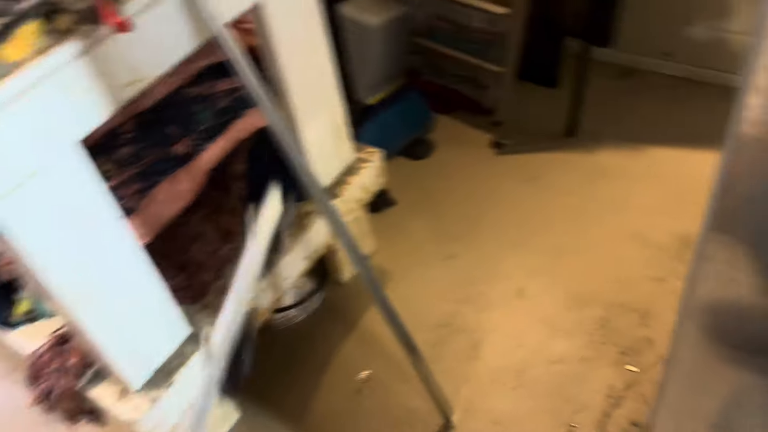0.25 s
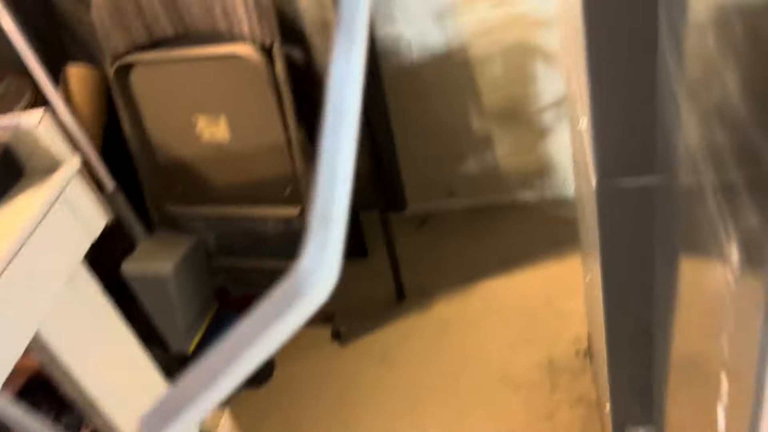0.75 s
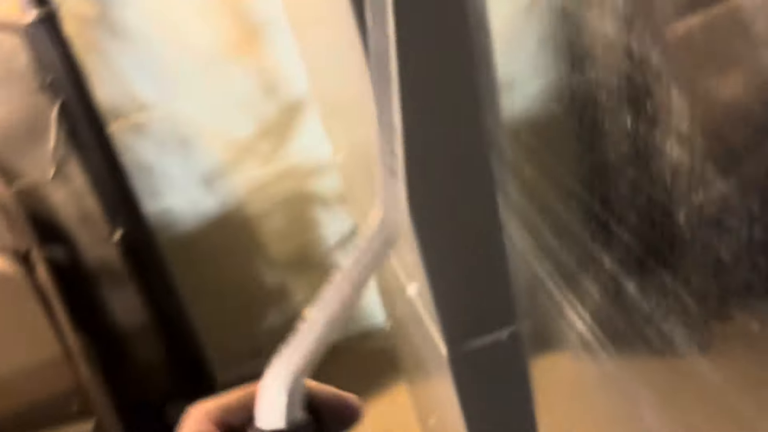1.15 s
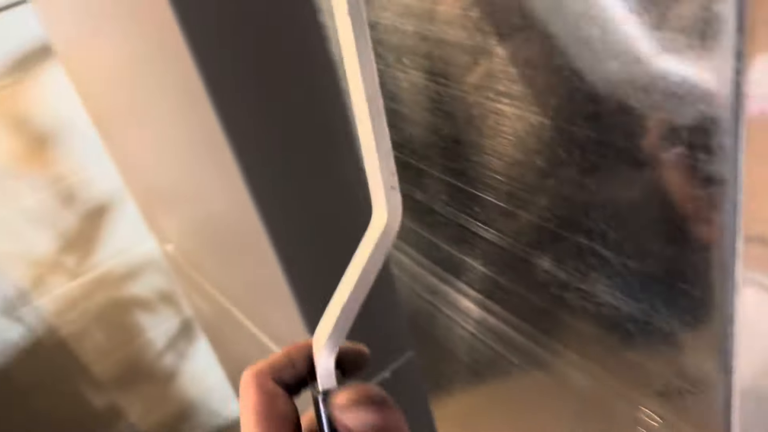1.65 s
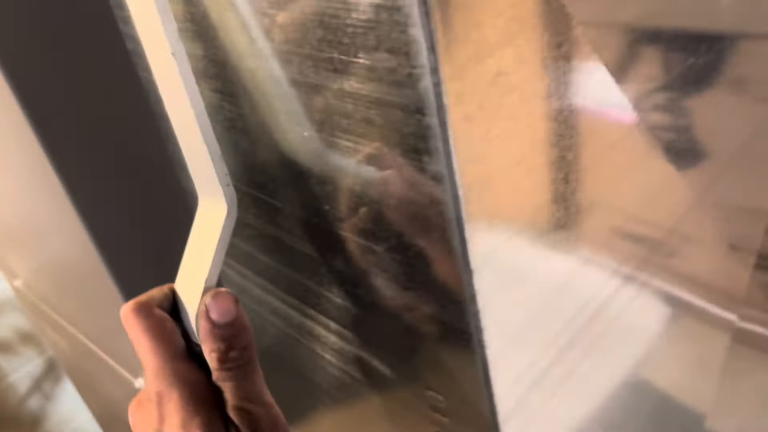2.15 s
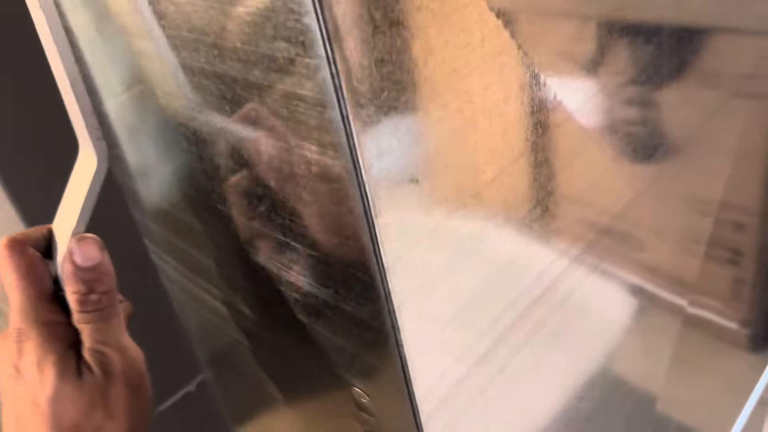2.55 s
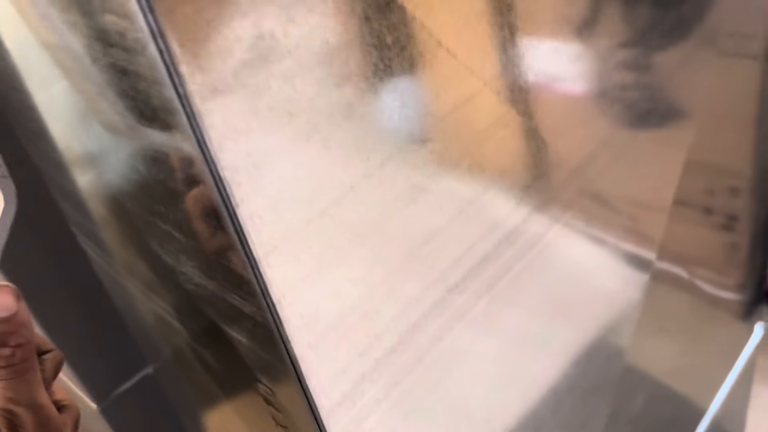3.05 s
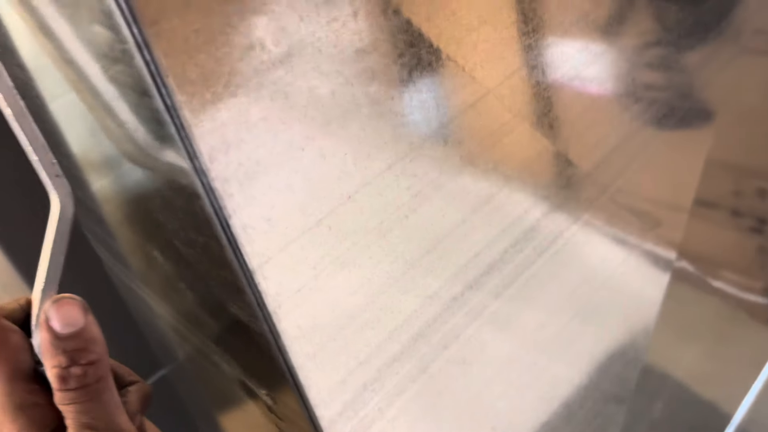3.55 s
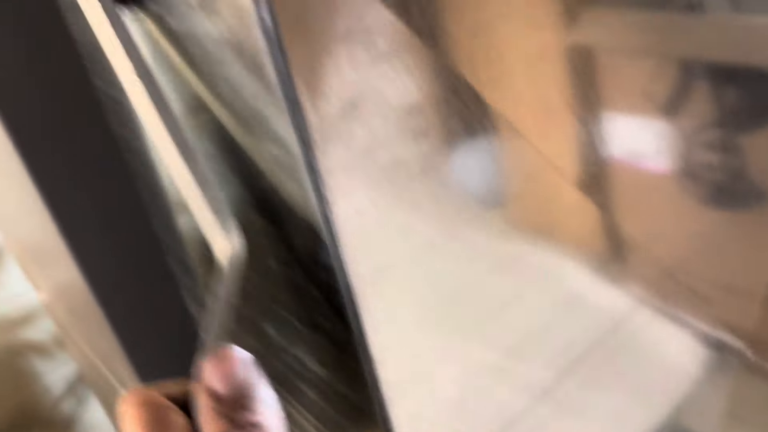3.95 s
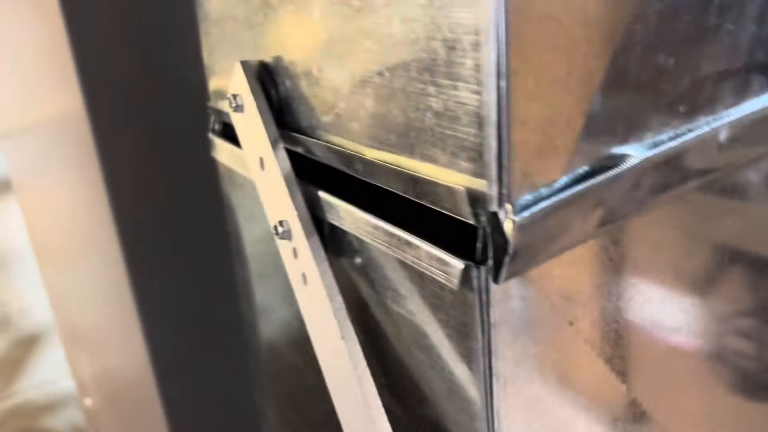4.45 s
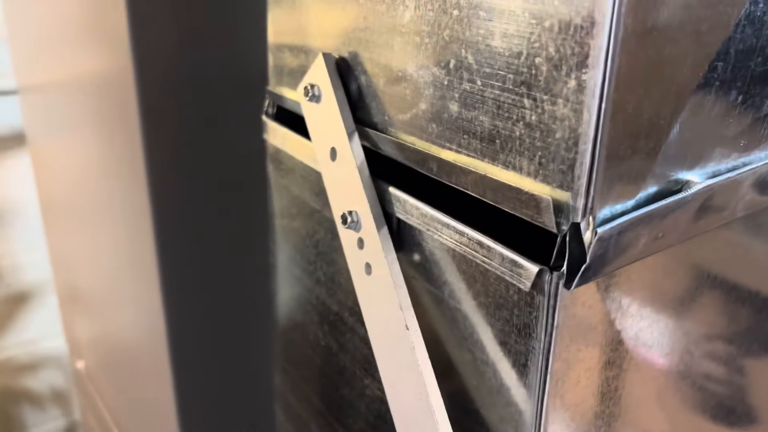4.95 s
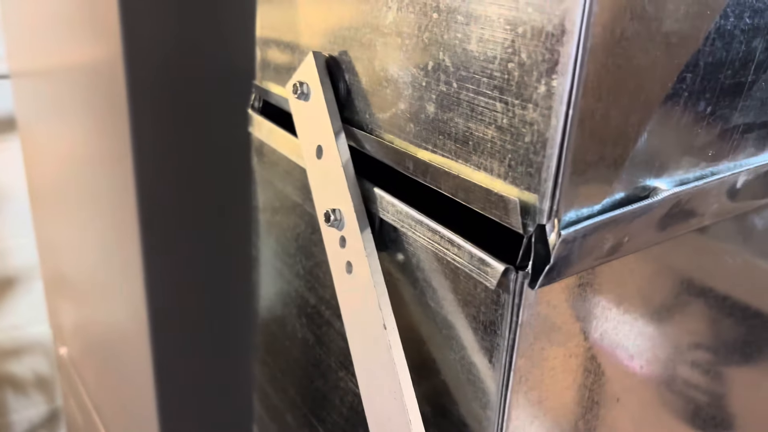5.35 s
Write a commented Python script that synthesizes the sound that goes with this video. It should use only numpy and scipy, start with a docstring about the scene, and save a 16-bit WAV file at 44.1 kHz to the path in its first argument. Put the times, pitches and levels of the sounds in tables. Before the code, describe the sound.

Sheet-metal ductwork is handled close by in a basement: irregular clanks, booming thin panels, wobbling rumbles, light scrapes and dry creaks over a low room drone.

```python
"""Clanks, ticks and scrapes of steel on sheet metal, close by: a bent hand tool works along a duct seam in a basement.
Each clank is noise split into bands that fade like thin panels, with clear tones and the ring of the struck part.
Blows make some panels boom, pushes make a low wobbling rumble, and slips of the seam make dry creaks.
Faint breathy hisses, a few dull bumps and the low drone of the room lie underneath, made of filtered noise and sines."""
import sys
import numpy as np
from scipy import signal
from scipy.fft import rfft, irfft
from scipy.io import wavfile
from scipy.ndimage import uniform_filter1d

SR = 44100
rng = np.random.default_rng(int(sys.argv[2]) if len(sys.argv) > 2 else 0)


def digitize_waveform(pressure):
    """Quantize a signal to 16-bit integers and store it at the path in sys.argv[1].

    Rows of a 2-D input are taken as channels; values are limited to [-1, 1].
    """
    field = np.atleast_2d(pressure).T
    bounded = np.clip(field, -1, 1)
    quanta = np.round(bounded * 32767).astype(np.int16)
    wavfile.write(sys.argv[1], SR, quanta)


N = 246513
TIME = np.arange(N) / SR  # [s]
FREQS = np.fft.rfftfreq(2 ** 18, 1 / SR)  # [Hz]

# the tool hits the duct: (time [s], level [dB], bass [dB], body [dB], clatter [dB], treble [dB],
# crack [dB], ring length [factor], part that rings [name], level of that part [dB])
# all levels after the first are relative to the blow
BLOWS = [(0.1354, -53.5, -4, -7, -16, -41, -9, 0.99, "bracket", -6),
         (0.216, -63.5, -22, -17, -6, 18, 23, 0.061, "lip", -19),
         (0.479, -55.5, 1.5, 4.5, 2, -9.5, -4, 0.9, "seam", 4.5),
         (0.635, -60.5, 3, 9, -12, -16, 4, 0.25, "bracket", -4),
         (1.312, -32.5, -1, -4.5, -3, 2, 17.5, 0.31, "rim", -2.5),
         (1.32, -37, -9, -5.5, -3.5, -0.5, -8, 1.23, "seam", -3),
         (1.394, -44, -24, -16, -3, -13, 9, 0.29, "seam", 1.5),
         (1.532, -55.5, 5, 5, -1, 2, 6, 0.51, "seam", 13),
         (1.599, -46.5, -33, -27, -6, -19, -1, 0.29, "seam", 3.5),
         (1.735, -38.5, -1.5, 0, -3.5, -7, -1, 0.62, "corner", 0.5),
         (1.777, -41.5, 0, 1, -21, -34, -7, 0.43, "corner", -5),
         (1.913, -58.5, 11, 11.5, -17, -50, 2, 2.6, "corner", 4.5),
         (2.0578, -63, 6, 14, 9, 7, 17, 1.02, "bracket", -20),
         (2.10, -62, 10, -2, 3, -8, -6, 0.77, "corner", 4.5),
         (2.208, -54.5, 8, 9.5, 3, -10, -12, 0.098, "cleat", -10.5),
         (2.53, -41, -1.5, 0.5, 0, -15, -14, 0.61, "hem", -4.5),
         (2.565, -49, 6, 6, 0, -10, -2, 0.43, "hem", -2),
         (2.735, -41, 1, 5, -1, 1.5, 17, 0.57, "lip", -3.5),
         (2.802, -42, -7, -0.5, 2, -2.5, 15.5, 1.16, "cleat", -1),
         (2.8792, -29, -2.5, -6, 7.5, -5, 7.5, 0.18, "flange", -2),
         (2.895, -30.5, 2.5, 2.5, 1, -1.5, 10, 0.61, "tool", 0),
         (2.908, -36, 0, 2.5, -3, -5.5, -3, 0.76, "stiffener", -5.5),
         (2.951, -36, 4.5, 4.5, 2.5, -12, 5, 0.48, "stiffener", -7.5),
         (3.011, -45.5, 12, 4.5, -20, -20, -3, 0.63, "seam", 3),
         (3.289, -43, -3.5, -7, -5.5, -23, -9, 0.79, "bracket", -7.5),
         (3.56, -44, -4, 1.5, 1, -4.5, 8, 0.62, "bracket", -2),
         (3.952, -48, 11, 5, 7, 1, 6, 0.85, "bracket", -5),
         (3.9658, -32.5, -2, 2.5, 0, -5.5, 9, 0.72, "joint", -6),
         (3.987, -38.5, 4, -6, -6, -5.5, 13, 0.76, "joint", -12),
         (4.004, -45, 4, -4, -18, -22, 5, 1, "seam", -6),
         (4.043, -50.5, 9, -5, -16, -22, -4, 0.58, "bracket", -15),
         (4.749, -43, 5.5, -9.5, -1.5, 1.5, 14, 0.36, "bracket", -6.5),
         (4.963, -65, 3, -1, 2, 2, 11, 0.36, "lip", -15),
         (5.1081, -48.5, 9, -2, 3, 3, 17.5, 0.48, "bracket", -8.5),
         (5.1919, -60.5, 2, -9, 8, 7.5, 16, 0.45, "bracket", -13)]
# how the thin panels answer, by band: (frequency [Hz], level [dB], first t60 [s] at ring length 1,
# bloom time constant [s], lingering share [dB], lingering t60 [s])
SHEET = [(57.6, -1.5, 0.26, 0.024, -8.5, 2.36), (151, -2.5, 0.37, 0.031, -10.5, 4.33),
         (238, -1.5, 0.55, 0.028, -8, 1.83), (557, 1.5, 0.6, 0.1, -45, 1.1),
         (1060, -9, 0.99, 0.0056, -19.5, 0.31), (2160, -4, 0.48, 0.012, -8.5, 0.34),
         (4110, -4, 0.37, 0.00043, -35, 2.6), (6440, -4, 0.31, .0005, -23.5, 1),
         (11300, 0.5, 0.2, 0.00089, -26.5, 1.02)]
SWELL_S = 0.0028  # the panels take about this long to answer a blow


def clanks(crack_s=0.00099, flex_db=1.5, modes_scatter_db=3, rattle_db=3, rattle_s=0.038):
    """Each blow: a crack, a rattling crowd of panel modes that bloom and fade by band, and a few clear modes."""
    out = np.zeros((2, N))
    t = TIME[:2 * SR].astype(np.float32)
    freqs = np.fft.rfftfreq(2 * SR, 1 / SR)
    log_hz = np.log([row[0] for row in SHEET])
    radiated = freqs ** 4 / (freqs ** 4 + 41.0 ** 4)  # thin panels radiate little deep bass

    # neighbouring bands overlap, so that their powers add up evenly
    overlaps = [np.interp(np.log(freqs + 1), log_hz, band) for band in np.eye(len(SHEET))]
    bands = np.float32([radiated * np.sqrt(overlap) for overlap in overlaps])
    blooming = [-np.expm1(-t / bloom_s) for _, _, _, bloom_s, *_ in SHEET]
    lingering = [amp(share_db - 60 * t / t60) for *_, share_db, t60 in SHEET]
    rings = duct_rings(t)
    # as the panels flex, energy wanders from band to band
    flexing = np.tile([amp(flex_db * drift(size=1100)) for _ in SHEET], 2)

    for s, db, bass_db, body_db, clatter_db, treble_db, crack_db, length, *_ in BLOWS:
        tilt = [(250, bass_db), (500, body_db), (1500, 0), (3600, clatter_db), (9000, treble_db)]
        noise = rng.standard_normal((2, len(t)), np.float32)
        crowd = np.complex64(rfft(noise) * ripple(freqs))
        sound = np.zeros((2, len(t)), np.float32)
        flexes = flexing[:, round(s * SR):][:, :len(t)]
        for row, band, bloom, late, flex in zip(SHEET, bands, blooming, lingering, flexes):
            hz, band_db, t60, *_ = row
            early = np.exp(-np.minimum(np.log(1000) * t / (t60 * length), 20))
            gain = amp(band_db + read(tilt, hz)) * (early + late) * flex * bloom
            sound += unit(irfft(crowd * band)) * np.float32(gain)

        # every blow stirs the clear modes by its own amounts and phases
        scatter = modes_scatter_db * rng.standard_normal((2, len(DUCT)))
        weights = amp(read(tilt, np.array(DUCT)[:, 0]) + scatter)
        phases = np.exp(2j * np.pi * rng.random(weights.shape))
        sound += ((weights * phases).astype(np.complex64) @ rings).real

        # loose edges chatter while the sheet still swings widely
        chatter = np.clip(drift(size=90, count=len(t)), -2, 1)
        rattle = amp(rattle_db * np.exp(-t / rattle_s) * chatter)
        add(out, s, amp(db) * sound * rattle * (1 - np.exp(-t / SWELL_S)))

        crack = rng.standard_normal((2, SR // 20)) * np.exp(-t[:SR // 20] / crack_s)  # the first contact
        add(out, s, amp(db + crack_db) * crack)
    return out


# clearest modes of the duct, also used by wobble(): (frequency [Hz], relative level [dB], t60 [s])
DUCT = [(103.6, -7.5, 2.5), (181.4, -7, 1.6), (327.2, -7.5, 1.76), (423, -8, 0.64), (491.6, -6, 0.45),
        (544.5, -8.5, 0.9), (589, -8, 0.43), (632, -17.5, 0.48), (884, -9, 0.23), (910, -2, 0.11),
        (1028, -9, 0.45), (1130, -16, 0.91), (1263, -11, 0.6), (1550, -12, 0.31), (2000, -16, 0.2)]


def duct_rings(t, modes_db=-2, waver_hz=3.16):
    """The decay of each clear mode; its pitch wavers as the panel bends."""
    rings = []
    for hz, db, t60 in DUCT:
        turns = np.cumsum(hz + waver_hz * drift(size=3000, count=len(t))) / SR
        rise = 1 - np.exp(-t * hz / 5)  # over about five cycles
        rings.append(amp(db + modes_db - 60 * t / t60) * rise * np.exp(2j * np.pi * turns))
    return np.array(rings, np.complex64)


# modes of the stiff parts, by name: (frequency [Hz], level relative to the part [dB], t60 [s])
EDGE_MODES = { "rim": [(1782, -5, .3), (2164, -10, .15), (3661, 1, .14), (4371, 4, .15), (4770, -8, .2),
              (7014, -1, .06), (7305, -7, .17), (8280, -4, .1), (8640, 0, .15), (8950, -7, .25)],
              "corner": [(996, 0, .38), (1114, -7, .4), (1227, -2, .35), (1484, -7, .35), (1701, -1, .22),
              (1938, -10, .35), (2353, -6, .2), (2713, -7, .25), (3472, -14, .2)],
              "seam": [(1435, -2, 0.063), (1720, 0.5, 0.1), (1950, -2, 0.12), (2180, -4, 0.052),
              (2550, -17, 0.11)], "lip": [(2546, -4, .15), (4300, -1, .13), (4963, 0, .16), (5330, 0, .1),
              (5680, 2, .09), (5820, 5, .11), (7644, 1, .12)], "cleat": [(2820, -9, 0.43), (3600, -7, 0.37),
              (3680, -1, 0.21), (4000, 2, 0.18), (4060, -2, 0.11), (4400, -9, 0.41)],
              "hem": [(1066, 0, .25), (1400, -2, .2), (2830, -3, .15), (3020, -2, .18), (4081, -6, .18),
              (4387, -5, .18), (4544, -6, .15)], "stiffener": [(1270, -2, .4), (1324, -2, .35),
              (1486, -2, .4), (1873, 1, .4), (2972, -6, .25), (3401, -5, .3), (3570, -1, .24),
              (3600, -2, .24), (4996, -7, .25)], "joint": [(910, -1, .5), (1028, -5, .45), (1340, -2, .45),
              (1787, -4, .3), (2110, -5, .25), (2401, -6, .25), (2837, -6, .22), (3585, -4, .22),
              (4366, -6, .2)], "flange": [(6650, -4, 0.14), (6900, -14, 0.073), (6940, -6, 0.14),
              (7670, -7, 0.22), (8100, -1, 0.2), (13100, -8, .06)], "bracket": [(1125, -3, .15),
              (1319, 0, .2), (2050, -4, .09), (2750, 0, .08), (3085, -1, .08), (3401, 0, .09),
              (4330, -1, .09), (4646, -3, .09)], "tool": [(13370, -22, 0.5), (13450, -16, 0.6),
              (13400, -22, 0.55), (13600, 3, 0.04)]}


def pings(rise_s=0.00076, twin_db=-7, twin_share=0.0092):
    """The struck part rings; each mode beats against a weaker twin close by."""
    out, t = np.zeros((2, N)), TIME[:SR // 2]
    for s, db, *_, part, part_db in BLOWS:
        for hz, mode_db, t60 in EDGE_MODES[part]:
            twin_hz = hz * (1 + twin_share * rng.uniform(-0.92, 1))
            phases = rng.random((2, 2, 1))
            main = np.sin(2 * np.pi * (hz * t + phases[0]))
            twin = amp(twin_db) * np.sin(2 * np.pi * (twin_hz * t + phases[1]))
            fade = amp(db + part_db + mode_db - 60 * t / t60)
            add(out, s, fade * (1 - np.exp(-t / rise_s)) * (main + twin))
    return out


# blows set a whole panel booming: (time [s], level [dB], panel [name])
BOOMS = [(1.76, -40, "side"), (2.91, -29.5, "side"), (3.576, -45.5, "top"), (3.985, -37, "top")]
# low modes of those panels, by name: (frequency [Hz], relative level [dB], t60 [s])
PANEL_MODES = {"side": [(328, -4, 1), (409, -4.5, 0.92), (488, -4, 1), (520, -1.5, 0.6)],
               "top": [(314, -4, 0.63), (368, 3, 0.45), (430, -3, 0.66), (497, -11, 0.52)]}


def booms(bloom_s=0.019, sharp=0.021, settle_s=0.076, waver_hz=2.64):
    """A shaken panel swells into its low modes; they start sharp while it swings widely, then settle."""
    out, t = np.zeros((2, N)), TIME[:SR]
    for s, db, panel in BOOMS:
        for hz, mode_db, t60 in PANEL_MODES[panel]:
            settling = hz * (1 + sharp * np.exp(-t / settle_s))
            pitch = settling + waver_hz * drift(size=2000, count=len(t))
            swing = np.sin(2 * np.pi * (np.cumsum(pitch) / SR + rng.random((2, 1))))
            add(out, s, amp(db + mode_db - 60 * t / t60) * (1 - np.exp(-t / bloom_s)) * swing)
    return out


# strokes of the tool along the sheet, each held for its length and then fading:
# (start time [s], length [s], level [dB], t60 of the fade [s])
STROKES = [(.015, 0.016, -53.5, 0.67), (.56, 0.051, -54.5, 0.53), (.978, 0.098, -52.5, 0.6),
           (1.057, 0.048, -35.5, 0.16), (1.5, 0.47, -66, 2.1), (2.3, 0.1, -55, 0.47),
           (2.38, 0.093, -53.5, 0.44), (2.5, 0.1, -55.5, 0.075), (3.3, 0.088, -62, 0.37),
           (4.3, 0.3, -77, 0.25), (4.72, 0.19, -65, 1.14), (5.05, 0.089, -62.5, 0.27),
           (5.42, 0.13, -67.5, 0.2)]
# colour of the scrape: (frequency [Hz], relative level per Hz [dB])
SCRAPE = [(100, -1), (300, 14.5), (700, 7.5), (1500, 7), (2600, 5), (5000, 7), (7000, 5), (9000, 3),
          (12000, 0.5), (15500, -5)]
STROKE_ATTACK_S, RESTING_DB = 0.029, -71.5  # between strokes the tool barely grazes the sheet
CATCH_DB = 1.6  # unevenness of the catching


def scraping():
    """Steel catches unevenly on the fine grain of the zinc coat and stirs the modes of the sheet."""
    drive = rng.standard_normal((2, N))  # the tiny catches come so densely that they merge
    ringing = irfft(spectrum(drive) * ripple(FREQS, fine_db=2.5, broad_db=.7))[:, :N]
    catching = unit(amp(CATCH_DB * drift(size=200)))
    return effort(STROKES, STROKE_ATTACK_S, RESTING_DB) * catching * colour(ringing, SCRAPE)


# spells of creaking in the seam: (start time [s], length [s], level at the end before gain_db [dB])
CREAKS = [(4.345, 0.2, -64), (4.556, 0.15, -49), (5.424, 0.069, -47), (5.518, 0.041, -38)]
# slips that stand out: (time [s], level [dB])
SLIPS = [(4.331, -64), (4.354, -62), (4.385, -53), (4.408, -64), (4.421, -57), (4.445, -57), (4.47, -57),
         (4.545, -65), (4.572, -58), (4.601, -55), (4.672, -63), (5.413, -57.5), (5.436, -54), (5.458, -47),
         (5.479, -48.5), (5.514, -45.5), (5.546, -48)]
# colour of the creaking: (frequency [Hz], relative level per Hz [dB])
CREAK_COLOUR = [(200, -24), (900, 3), (2000, 7), (2900, 7.5), (4000, 3.5), (5200, -6), (7600, 1.5),
                (12000, -6), (15500, -7)]
# slips come almost evenly (jitter is a share of the gap) and grow as the strain builds
SLIP_GAP_S, SLIP_JITTER, CREAK_BUILD_DB_PER_S = 0.014, 0.052, 55


def creaks(slip_s=0.0011, ring_db=-14, ring_s=0.015, gain_db=-7, scatter_db=2):
    """The seam sticks and slips in runs of tiny dry ticks, a few of which stand out."""
    out, t = np.zeros((2, N)), TIME[:SR // 10]
    tick = np.exp(-t / slip_s) + amp(ring_db) * np.exp(-t / ring_s)
    for start, length, db in CREAKS:
        chances = rng.standard_normal(size=(20, 2))
        for at, (shift, size) in zip(np.arange(0, length, SLIP_GAP_S), chances):
            slip_db = db + gain_db + scatter_db * size - CREAK_BUILD_DB_PER_S * (length - at)
            add(out, start + at + shift * SLIP_JITTER * SLIP_GAP_S, amp(slip_db) * tick)
    for s, db in SLIPS:
        add(out, s, amp(db) * tick)
    return out * colour(rng.standard_normal((2, N)), CREAK_COLOUR)  # the ticks shape a steady noise


# faint breathy hisses, some gliding upward:
# (start time [s], length [s], level [dB], centre frequency [Hz], glide [Hz per s])
HISSES = [(0.17, 0.021, -64, 4650, 0), (4.334, 0.1, -63, 1864, 1405), (4.466, 0.23, -69, 2010, 1898),
          (4.52, 0.39, -67.5, 4856, 99)]
HISS_WIDTH, HISS_ATTACK_S, HISS_T60_S = 0.13, 0.017, 0.26  # the width is a share of the centre frequency
HISS_FLUTTER_DB = 2.2


def hisses():
    """Narrow bands of fluttering noise, some gliding upward: slow noise is moved up to each centre frequency."""
    out = np.zeros((2, N))
    for start, length, db, hz, glide in HISSES:
        centre_hz = hz + glide * np.clip(TIME - start, 0, length)
        turn = np.exp(2j * np.pi * np.cumsum(centre_hz) / SR)
        noise = rng.standard_normal((2, N)) + 1j * rng.standard_normal((2, N))
        b, a = signal.butter(2, HISS_WIDTH * hz / 2, fs=SR)
        slow_noise = signal.lfilter(b, a, noise)
        hiss = unit((slow_noise * turn).real)
        out += gesture(start, length, db, HISS_T60_S, HISS_ATTACK_S) * hiss
    return out * unit(amp(HISS_FLUTTER_DB * drift(size=300)))


# the hand pushes a panel: (start time [s], length [s], level [dB], t60 of the fade [s])
PUSHES = [(2.36, 0.078, -34, 1.17), (2.72, 0.099, -36, 2.4), (3.05, 0.21, -52, 0.85), (4.1, 1, -52.5, 3.4),
          (4.66, 0.17, -42.5, 0.77), (5.07, 0.055, -45, 1.5), (5.4, 0.27, -40.5, 0.62)]
# colour of the rumble: (frequency [Hz], relative level per Hz [dB])
WOBBLE = [(25, -50), (55, 1), (103, -2.5), (140, 3), (190, 1.5), (260, -16), (350, -14.5), (500, -13.5),
          (700, -17.5), (1200, -28), (2500, -29), (6000, -61)]
PUSH_ATTACK_S, LEANING_DB = 0.084, -53.5  # between pushes the hand still leans on the duct


def wobble(modes_db=5, width_hz=7):
    """Pushed panels rumble: noise that is lifted at the modes of the duct."""
    peaks = np.max([1 / (1 + ((FREQS - hz) / width_hz) ** 2) for hz, *_ in DUCT], axis=0)
    noise = rng.standard_normal((2, N))
    drive = irfft(spectrum(noise) * amp(modes_db * peaks))[:, :N]
    return effort(PUSHES, PUSH_ATTACK_S, LEANING_DB) * colour(drive, WOBBLE)


# dull bumps: (time [s], level [dB], pitch [Hz])
BUMPS = [(0.4796, -31.5, 219), (0.481, -35, 326), (0.493, -31.5, 201), (0.524, -40.5, 216),
         (1.222, -22.5, 86), (1.257, -23.5, 65), (1.293, -22, 72), (1.803, -36.5, 60.3), (2.905, -34, 170),
         (2.955, -22.5, 103)]
# parts of each bump: (multiple of the pitch [factor], level relative to the bump [dB])
BUMP_PARTIALS = [(1, 5), (1.69, 2.5), (2.6, -4.5)]
BUMP_RISE_CYCLES = 0.96


def bumps():
    """Soft, heavy contacts: a few low swings that rise and die at once."""
    out, t = np.zeros((2, N)), TIME[:SR // 4]
    for s, db, hz in BUMPS:
        for multiple, partial_db in BUMP_PARTIALS:
            turns = hz * multiple * t
            u = turns / BUMP_RISE_CYCLES
            envelope = u ** 2 * np.exp(2 * (1 - u))  # peaks at u = 1
            swing = envelope * np.sin(2 * np.pi * turns)
            add(out, s, amp(db + partial_db) * swing * [[1], [0]])  # only in the shared row
    return out


# colour of the room: (frequency [Hz], relative level per Hz [dB])
ROOM = [(20, -29), (45, -7.5), (70, -0.5), (115, 4), (150, -19.5), (210, -3), (300, -6.5), (500, -14.5),
        (1000, -16), (2000, -24.5), (4000, -33.5), (7000, -50), (13500, -56), (16000, -68)]
ROOM_DB = -52.5


def room(hum_hz=117, hum_db=-57):
    """Low drone of the basement, as filtered noise, with a faint machine hum, a steady sine."""
    hum = amp(hum_db) * np.sin(2 * np.pi * hum_hz * TIME) * [[1], [0]]
    return amp(ROOM_DB) * colour(rng.standard_normal((2, N)), ROOM) + hum


def gesture(start, length, db, t60, attack_s):
    """Gain of one movement or hiss: attack, hold, fade."""
    t = TIME - start
    fade_db = np.minimum(60 * np.maximum(t - length, 0) / t60, 200)
    return np.clip(t / attack_s, 0, 1) * amp(db - fade_db)


def effort(rows, attack_s, rest_db):
    """Movements add in power to a steady light contact."""
    return np.sqrt(amp(rest_db) ** 2 + sum(gesture(*row, attack_s) ** 2 for row in rows))


def ripple(hz, fine_db=5.5, fine_hz=28, broad_db=1.0, broad_hz=160):
    """A contact excites an uneven choice of the many upper modes, none far above the rest: gain by frequency."""
    fine = np.interp(hz / fine_hz, np.arange(3000), rng.standard_normal(3000))
    broad = np.interp(hz / broad_hz, np.arange(3000), rng.standard_normal(3000))
    uneven_db = fine_db * np.minimum(fine, 1) + broad_db * broad
    return amp(uneven_db * hz / (hz + 400))  # less uneven in the bass


def drift(size, count=N):
    """Slow chance: count samples of noise averaged over size samples, at about rms 1."""
    return uniform_filter1d(rng.standard_normal(count), size=size, mode="wrap") * np.sqrt(size)


def amp(db):
    """Decibels to gain."""
    return np.exp(np.asarray(db) * (np.log(10) / 20))


def unit(x):
    """Scales to rms 1."""
    return x / np.sqrt(np.mean(x ** 2) + 1e-20)


def read(points, hz):
    """Reads a table of values by frequency, joined on a log-frequency axis."""
    f, value = np.transpose(points)
    return np.interp(np.log(hz + 1), np.log(f + 1), value)


def spectrum(x):
    """Spectrum on the FREQS grid."""
    return rfft(x, 2 * (len(FREQS) - 1))


def colour(x, points):
    """Filters x by the levels of a table, then scales it to rms 1."""
    return unit(irfft(spectrum(x) * amp(read(points, FREQS)))[..., :N])


def add(mix, s, sound):
    """Mixes a sound in at time s."""
    part = mix[:, round(s * SR):][:, :sound.shape[-1]]
    part += sound[..., :part.shape[1]]


# likeness of the two microphone ports: (frequency [Hz], likeness [0-1])
SAME = [(50, 0.97), (150, 0.96), (300, 0.91), (600, 0.64), (1200, 0.48), (1800, 0.045), (2800, 0.49),
        (4000, 0.61), (6000, 0.27), (6600, 1), (7600, 0.87), (8700, 0.055), (9400, 1), (10600, 0.98),
        (11300, 0.058), (12000, 0.72), (13500, 0.82), (14200, 1), (14900, 0.95)]
# how far the left port leads: (frequency [Hz], lead [radians])
LEAD = [(0, 0), (1100, .45), (3500, 0), (7500, 0), (9300, -np.pi), (10800, -np.pi), (11900, -2 * np.pi),
        (13500, -2 * np.pi), (14700, -3 * np.pi)]


def scene():
    """Row one is what both ports share, row two what sets them apart; the ports blend them by frequency."""
    hits = clanks() + booms() + pings() + bumps()
    handling = scraping() + wobble() + creaks()
    shared, apart = spectrum(hits + handling + hisses() + room())
    same = np.clip(read(SAME, FREQS), 0, .995)
    shared = shared * np.sqrt((1 + same) / 2)
    apart = apart * np.sqrt((1 - same) / 2)
    lag = np.exp(-1j * np.interp(FREQS, *np.transpose(LEAD)))
    ports = np.array([shared + apart, (shared - apart) * lag])
    return irfft(ports)[:, :N] * amp([[.3], [-.3]])  # left slightly louder


EDGE_HZ = 15900


def record(dry):
    """The band limit of the recorder: a steep low-pass filter takes off the highest treble."""
    lowpass = signal.firwin(255, EDGE_HZ, window=("kaiser", 9), fs=SR)
    return signal.oaconvolve(dry, lowpass[None], "same")


dry = scene()
out = record(dry)
digitize_waveform(out)
```